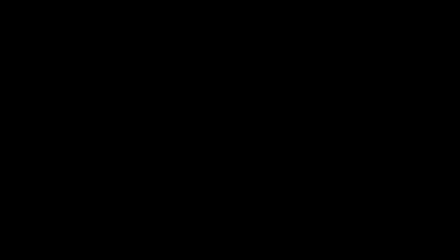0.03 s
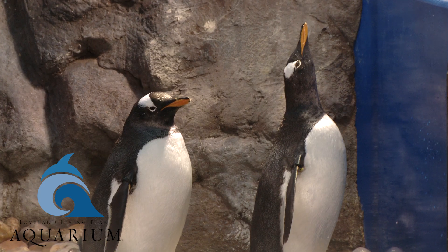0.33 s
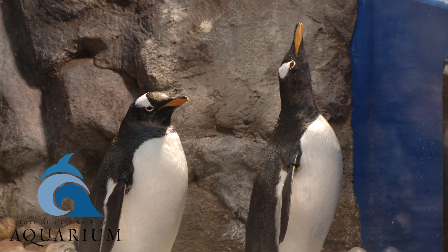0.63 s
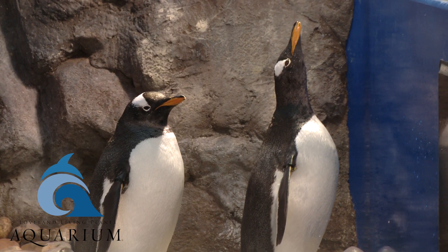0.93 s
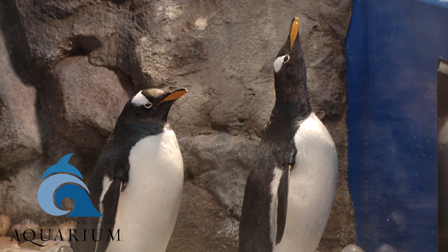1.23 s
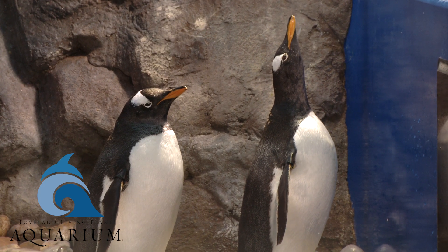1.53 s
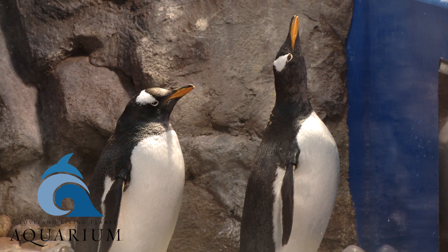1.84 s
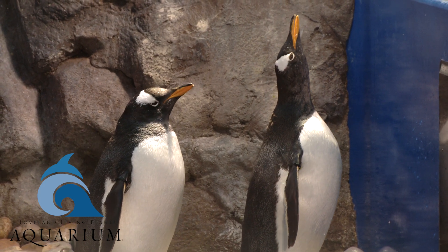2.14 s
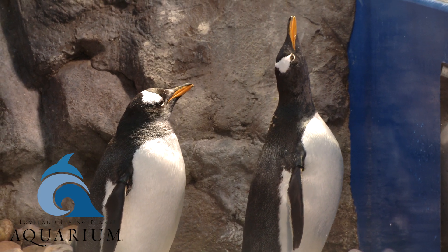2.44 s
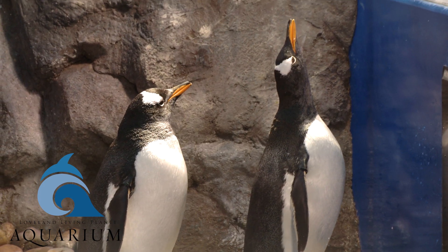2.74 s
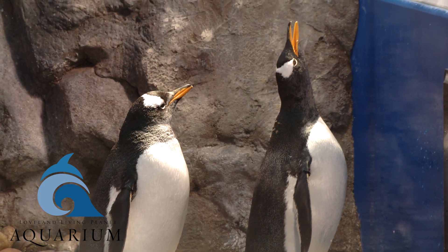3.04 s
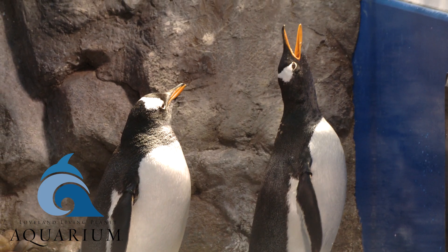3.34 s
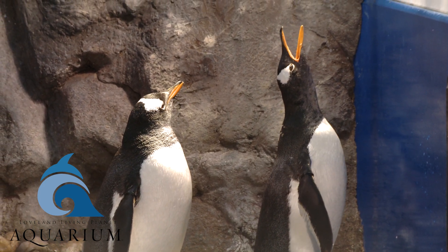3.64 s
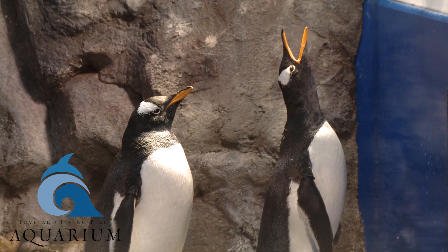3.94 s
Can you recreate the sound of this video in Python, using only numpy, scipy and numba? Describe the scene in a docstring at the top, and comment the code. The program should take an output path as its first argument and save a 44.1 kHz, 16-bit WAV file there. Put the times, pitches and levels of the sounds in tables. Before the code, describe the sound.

A penguin's loud, raspy call echoes in a rock enclosure over droning ventilation and water pumps.

```python
"""The sound starts abruptly on pumps and ventilation: a motor drone, hum and fan whine over rushing air and
water. A few faint, high hisses come and go. At about 3.3 s a gentoo penguin brays once, up to the end. The two
sides of its syrinx sound at different pitches, with rasping air, chopped into a fast rattle of syllables. The
call echoes in a hard rock enclosure, and a gain control ducks the machines under it."""
import sys
import numpy as np
from scipy import signal
from scipy.fft import rfft, irfft
from scipy.io import wavfile
from scipy.ndimage import uniform_filter1d
from numba import njit

SR = 44100
rng = np.random.default_rng(int(sys.argv[2]) if len(sys.argv) > 2 else 0)


def digitize_waveform(pressure):
    """Quantize a signal to 16-bit integers and store it at the path in sys.argv[1].

    Rows of a 2-D input are taken as channels; values are limited to [-1, 1].
    """
    field = np.atleast_2d(pressure).T
    bounded = np.clip(field, -1, 1)
    quanta = np.round(bounded * 32767).astype(np.int16)
    wavfile.write(sys.argv[1], SR, quanta)


N = 176400
TIME_S = np.arange(N) / SR


def undb(db):
    """Decibels to gain."""
    return 10 ** (np.asarray(db) / 20)


def unit(x):
    """Scale to rms 1."""
    return x / np.sqrt(np.mean(x ** 2))


def curves(table):
    """One automation curve for each column after a table's time column."""
    times, *columns = np.array(table, float).T
    return [np.interp(TIME_S, times, column) for column in columns]


def colour(x, points):
    """Equalise with a curve of (freq_hz, gain_db) points."""
    hz, db = np.array(points, float).T
    size = 2 * N
    freqs = np.maximum(np.fft.rfftfreq(size, 1 / SR), 1)
    gain = undb(np.interp(np.log(freqs), np.log(hz), db))
    return irfft(rfft(x, size) * gain, size)[..., :N]


def walk(rate_hz):
    """Smooth random drift with rms 1."""
    hold = max(int(SR / rate_hz), 1)
    steps = np.repeat(rng.standard_normal(N // hold + 1), hold)
    return unit(uniform_filter1d(uniform_filter1d(steps, hold), hold)[:N])


def stereo(mid, side):
    """Mid and side to left and right: narrow in the bass, wide in the treble."""
    # width of the diffuse sound: freq_hz, side_gain_db
    width = [(60, -36), (200, -22), (700, -16), (1290, -8.5), (2400, -7.5), (3300, 2.5), (4400, 12.5),
             (6000, 2), (8100, -2.5), (15000, 3)]
    return mid + colour(side, width) * np.array([[1], [-1]])


@njit
def follow(power, attack, release):
    """Envelope follower that rises and falls at different speeds."""
    out, envelope = np.empty(len(power)), 0.
    for i in range(len(power)):
        envelope += (power[i] - envelope) * (attack if power[i] > envelope else release)
        out[i] = envelope
    return out


def rush(level_db=-42):
    """Steady noise of moving air and water, as mid and side."""
    # spectrum of the flow: freq_hz, relative_db
    spectrum = [(10, -14), (18, -1.5), (28, -0.5), (40, -7), (65, -6), (90, -14), (130, -10), (210, -13.5),
                (260, -17.5), (310, -15.5), (460, -21), (720, -19.5), (1000, -22), (1600, -19.5),
                (1950, -23), (2300, -21), (2680, -23), (2950, -31.5), (3400, -29.5), (4000, -39.5),
                (5000, -48.5), (6600, -48), (7800, -51), (8600, -49), (9400, -52), (10300, -49),
                (11500, -58), (13500, -57), (15000, -59)]
    return undb(level_db) * unit(colour(rng.standard_normal((2, N)), spectrum))


def machine_tone(hz, db):
    """One machine tone wavering in pitch and level, as mid and side."""
    phase = 2 * np.pi * np.cumsum(hz + 0.76 * walk(6.84)) / SR
    amplitude = np.sqrt(2) * undb(db + 1.4 * walk(4.99))
    return amplitude * np.array([np.sin(phase), 0.72 * np.cos(phase)])


def motor_drone(pitch_hz=58.7, level_db=-50.5, swell_db=5.5, period_s=1.91, crest_s=0.42):
    """A low motor note that slowly swells and sinks."""
    swell = np.cos(2 * np.pi * (TIME_S - crest_s) / period_s)
    return machine_tone(pitch_hz, level_db + swell_db * swell)


def pump_hum():
    """The pumps hold a cluster of low and middle tones."""
    # pump tones: pitch_hz, level_db
    tones = [(173.1, -59.5), (232.7, -58.5), (408, -56), (599.7, -63), (814.3, -60)]
    return sum(machine_tone(hz, db) for hz, db in tones)


def fan_whine():
    """The fans' higher tones swell and sink together."""
    # fan tones: pitch_hz, level_db
    tones = [(1108.5, -63), (1164.3, -54.5), (1223, -66.5), (1284.5, -56.5), (1403.5, -63.5), (1632.5, -62)]
    # swell of the whine: time_s, gain_db
    swell = [(.36, 2.5), (.6, -1.5), (1.05, 0), (1.22, 3.5), (1.45, -2), (1.75, -0.5), (2.0, 1),
             (2.2, -0.5), (2.45, -2), (2.78, 1), (3.1, 0)]
    swell_db = curves(swell)[0]
    return sum(machine_tone(hz, db + swell_db) for hz, db in tones)


def hisses():
    """Thin bands of high noise, each swelling and fading on a bell curve."""
    # faint hisses: peak_s, level_db, rise_s, fall_s, centre_hz, width_hz
    swells = [(.98, -62, .15, 0.12, 9500, 4520), (2.6, -69, .006, .018, 15000, 2200),
              (3.198, -68, .005, 0.052, 15300, 2200)]
    freqs, out = np.fft.rfftfreq(N, 1 / SR), 0
    for peak_s, level_db, rise_s, fall_s, centre_hz, width_hz in swells:
        band = np.exp(-.5 * ((freqs - centre_hz) / width_hz) ** 2)
        noise = unit(irfft(rfft(rng.standard_normal((2, N))) * band, N))
        spread_s = np.where(TIME_S < peak_s, rise_s, fall_s)
        envelope = np.exp(-.5 * ((TIME_S - peak_s) / spread_s) ** 2)
        out = out + noise * undb(level_db) * envelope
    return out


def enclosure(x, t60_s=1, direct_db=-7.5, echo_db=0.5, build_s=0.0039, split_hz=3000):
    """Direct sound plus dense echoes off rock and glass; lows and highs ring equally long."""
    t = np.arange(SR) / SR
    dull = signal.lfilter(*signal.butter(2, split_hz, fs=SR), rng.standard_normal((2, SR)))
    bright = signal.lfilter(*signal.butter(2, split_hz, "high", fs=SR), rng.standard_normal((2, SR)))
    tails = (dull + bright) * np.exp(-np.log(1000) * t / t60_s) * np.minimum(t / build_s, 1)
    mid, side = (signal.fftconvolve(x, unit(tail) / np.sqrt(SR))[:N] for tail in tails)
    return stereo(undb(direct_db) * x + undb(echo_db) * mid, undb(echo_db) * side)


def membrane(hz, jitter, jitter_hz, harmonics):
    """One side of the syrinx pulses with an unsteady period; returns the pulses and their phase."""
    phase = 2 * np.pi * np.cumsum(hz * (1 + jitter * walk(jitter_hz))) / SR
    half_sine = np.sin(phase / 2)
    divisor = np.where(np.abs(half_sine) < 1e-9, 1e-9, half_sine)
    pulses = np.sin((harmonics + .5) * phase) / divisor - 1  # sum of equally strong harmonics
    return unit(pulses), phase


def throat(source, opening):
    """Throat resonances colour the voice, crossfading between two shapes as the bill opens."""
    # resonances with the bill nearly shut: freq_hz, gain_db
    bill_shut = [(100, -40), (165, -4.5), (245, -6), (340, -24.5), (450, -19), (680, -1.5), (860, -14.5),
                 (1105, -1), (1260, -16.5), (1550, -6.5), (1900, -11), (2200, -21), (2450, -1), (2680, -9),
                 (2900, -16.5), (3400, -19), (4100, -30), (5000, -38), (6800, -44), (8200, -46),
                 (10200, -45.5), (12000, -55), (16000, -47)]
    # resonances with the bill wide open: freq_hz, gain_db
    bill_open = [(100, -43), (180, -15), (290, -2.5), (410, -17.5), (470, -11.5), (570, -7), (790, -1.5),
                 (900, -2.5), (1170, -5), (1330, -8.5), (1610, 5.5), (1820, 0), (2000, 1.5), (2200, -2),
                 (2460, -2), (2680, -4.5), (2900, -14), (3400, -15), (4100, -24.5), (5000, -35),
                 (6800, -37), (8200, -46.5), (10200, -40.5), (12000, -53), (16000, -53)]
    return colour((1 - opening) * source, bill_shut) + colour(opening * source, bill_open)


def penguin(gain_db=10, syllable_hz=23.525, crest_s=3.632, rattle_depth_db=13, rattle_build_s=.25):
    """The bray: two syrinx voices arch in pitch and, with rasping air, surge on every syllable."""
    # pitch of the two voices: time_s, upper_hz, lower_hz
    pitch = [(3.28, 351.9, 241.8), (3.34, 358, 242.8), (3.42, 363.7, 245.5), (3.49, 393, 271.9),
             (3.61, 404.6, 277.5), (3.72, 403.7, 278), (3.82, 397.4, 279.9), (3.89, 378.3, 277.4),
             (3.96, 364.4, 275.3)]
    # force of the call and balance of its voices: time_s, effort_db, lower_voice_db
    effort = [(3.272, -54, -5), (3.279, -31, -3.5), (3.303, -24.5, -5), (3.309, -14.5, -3),
              (3.34, -17.5, -1.5), (3.42, -16.5, -2.5), (3.5, -11, -3), (3.62, -10, -15), (3.8, -9, -6),
              (4.0, -10.5, -14.5)]
    # movement of the bill: time_s, opening (0 nearly shut, 1 wide open)
    bill = [(3.31, 0), (3.35, 0.43), (3.43, 0.6), (3.49, 0.55), (3.6, 0.58), (3.82, 0.74), (3.89, 0.67),
            (3.96, 0.24)]
    upper_hz, lower_hz = curves(pitch)
    effort_db, lower_db = curves(effort)
    opening = curves(bill)[0]
    start_s = effort[0][0]

    syllables = np.cos(2 * np.pi * syllable_hz * (TIME_S - crest_s) + 0.19 * walk(15))
    bend = 1 + .035 * (syllables - .5)
    upper, upper_phase = membrane(upper_hz * bend, jitter=0.00793, jitter_hz=300, harmonics=40)
    lower, _ = membrane(lower_hz * bend, jitter=0.01356, jitter_hz=250, harmonics=56)
    lower *= 1 + 0.88 * walk(110)  # fast flutter roughens the lower voice
    rasp = unit(rng.standard_normal(N) * (1 + 0.68 * np.cos(upper_phase)))
    rasp_db = -1.5 - 4 * opening  # less rasp as the bill opens
    voice = upper + undb(lower_db) * lower + undb(rasp_db) * rasp

    build = np.clip((TIME_S - start_s) / rattle_build_s, 0, 1)
    rattle_db = rattle_depth_db * build * (syllables - 1) / 2
    drive = undb(gain_db + effort_db + rattle_db + 1.27 * walk(120)) * (TIME_S > start_s)
    return throat(drive * voice, opening)


def scene():
    """The bird in its enclosure, over the machines and faint hisses."""
    bray = enclosure(penguin())
    machines = stereo(*(rush() + motor_drone() + pump_hum() + fan_whine()))
    return bray + machines + hisses()


def record(dry):
    """Gain control ducks the mix under the call; a gate opens abruptly and a low-pass trims the top."""
    threshold_db, attack_s, release_s, slope = -28.5, 0.26, 0.55, 0.74
    open_s, fade_s, cutoff_hz = 0.3349, .003, 15750
    power = follow(np.mean(dry ** 2, axis=0), 1 / (attack_s * SR), 1 / (release_s * SR))
    gain = np.maximum(np.sqrt(power) / undb(threshold_db), 1) ** -slope
    gate = np.clip(np.minimum(TIME_S - open_s, TIME_S[-1] - TIME_S) / fade_s, 0, 1)
    low_pass = signal.ellip(10, .1, 80, cutoff_hz, fs=SR, output="sos")
    return signal.sosfilt(low_pass, dry * gain * gate)


dry = scene()
out = record(dry)
digitize_waveform(out)
```